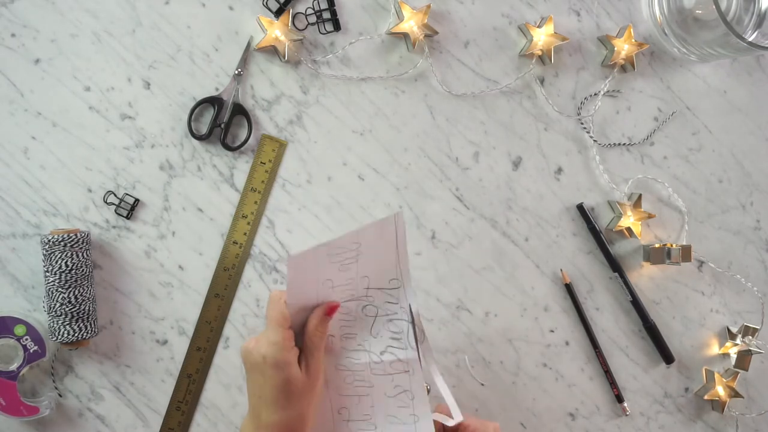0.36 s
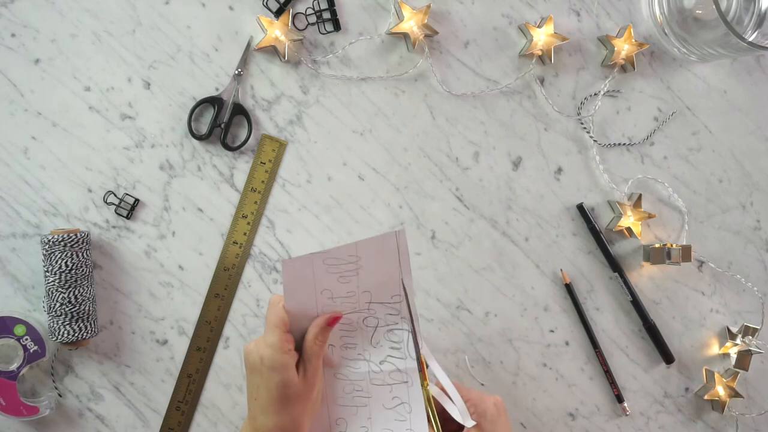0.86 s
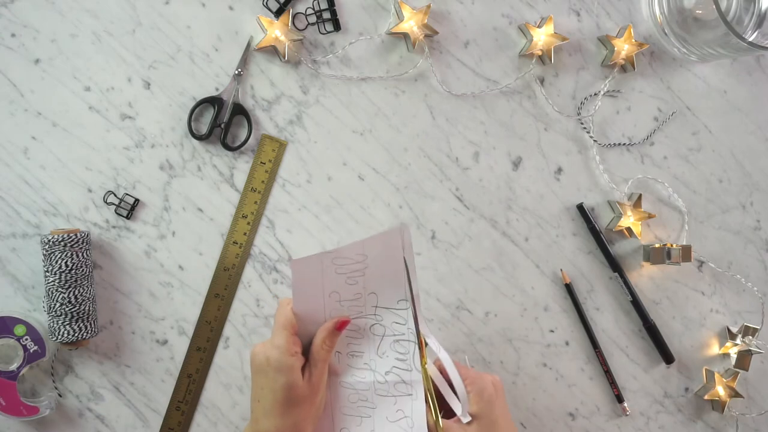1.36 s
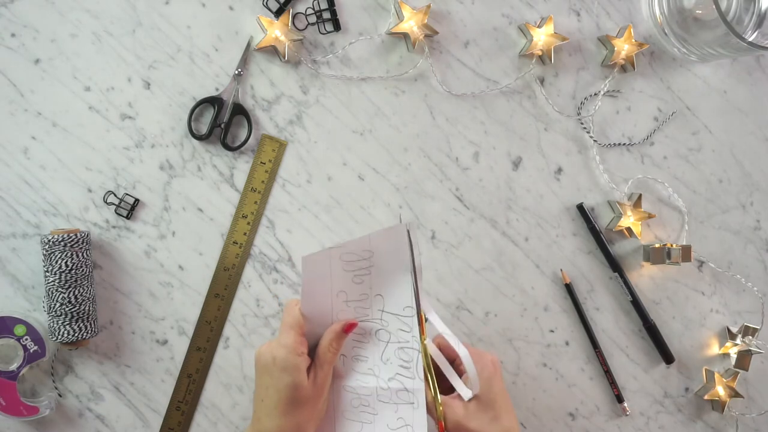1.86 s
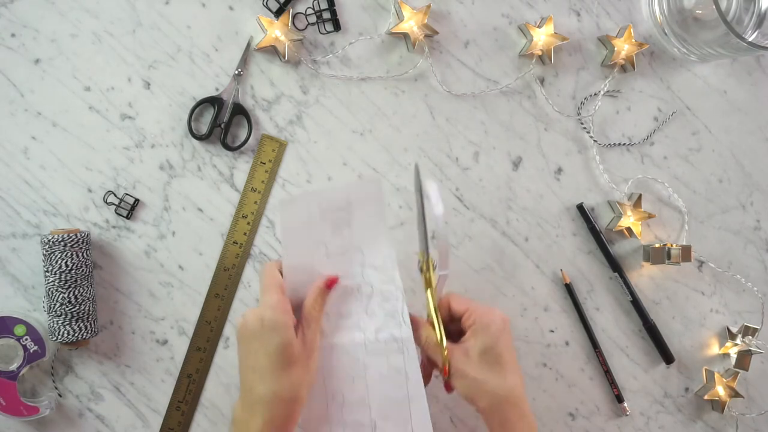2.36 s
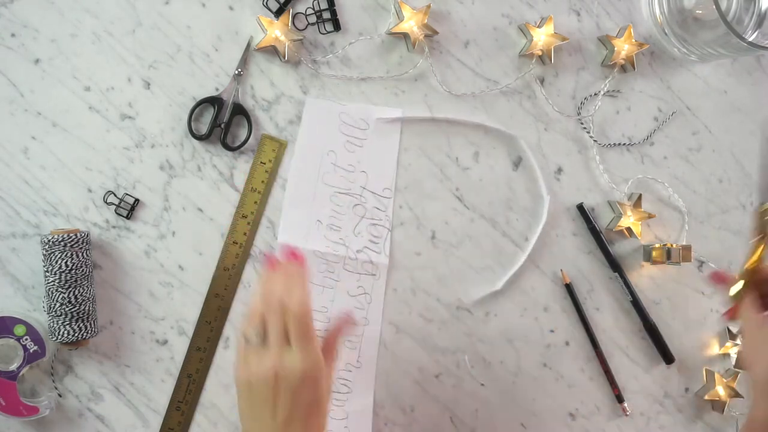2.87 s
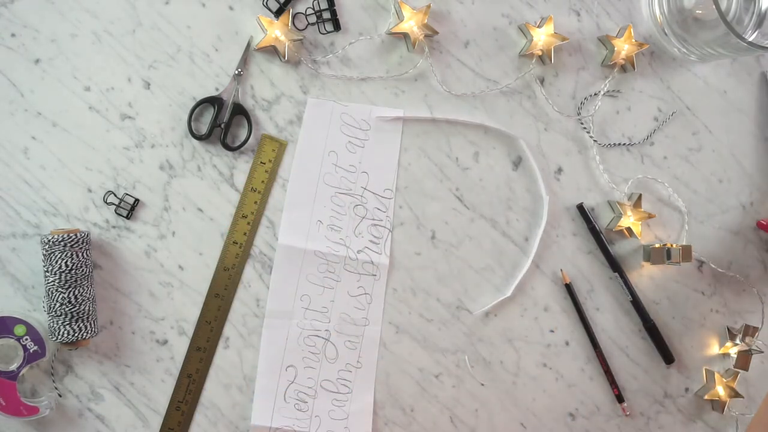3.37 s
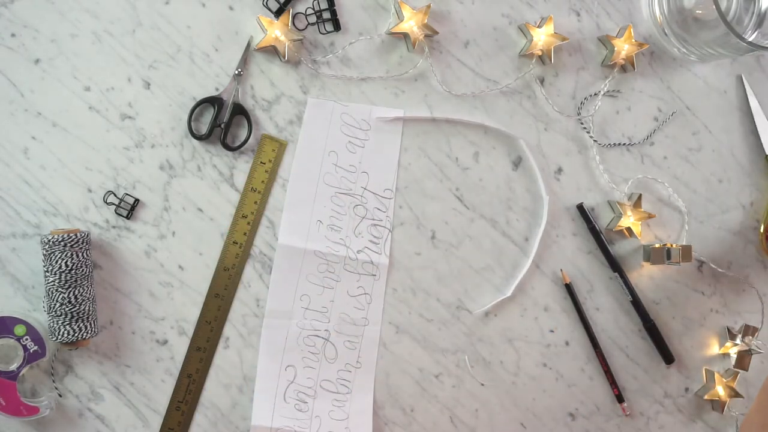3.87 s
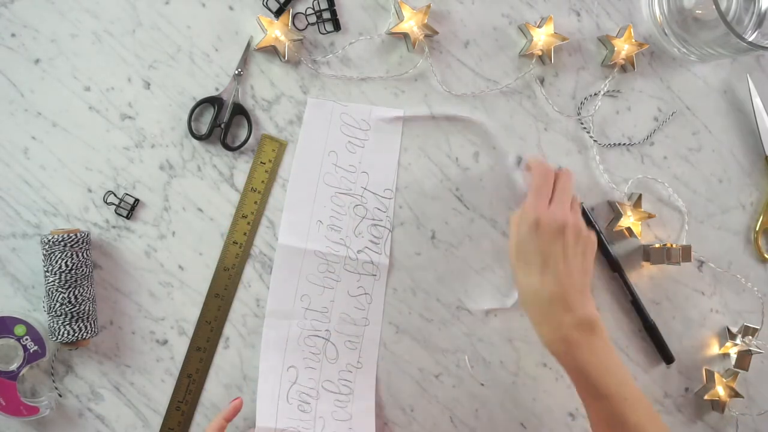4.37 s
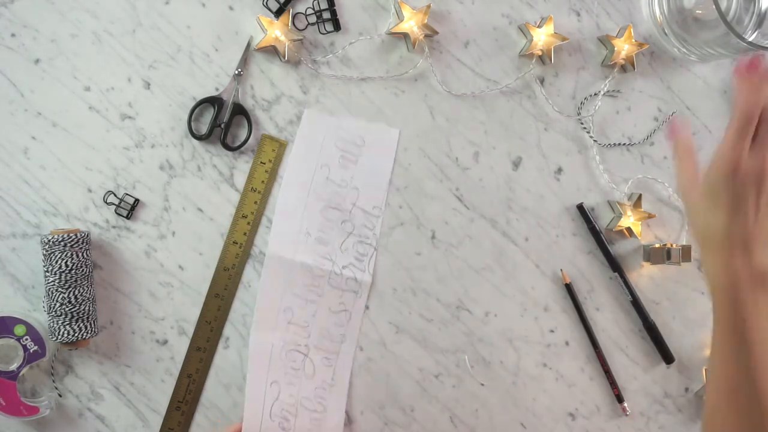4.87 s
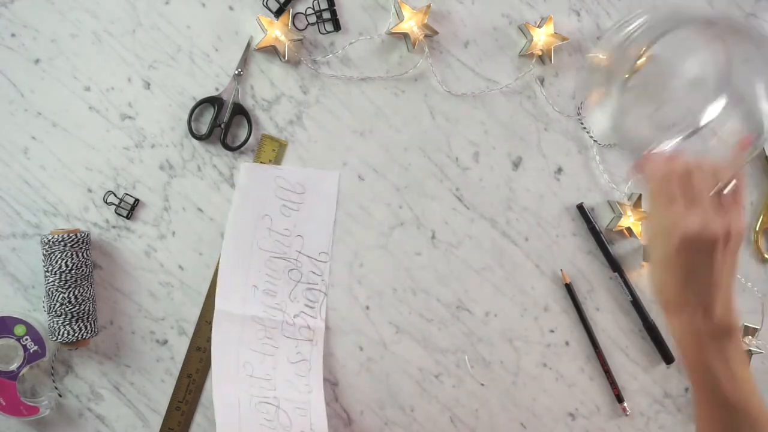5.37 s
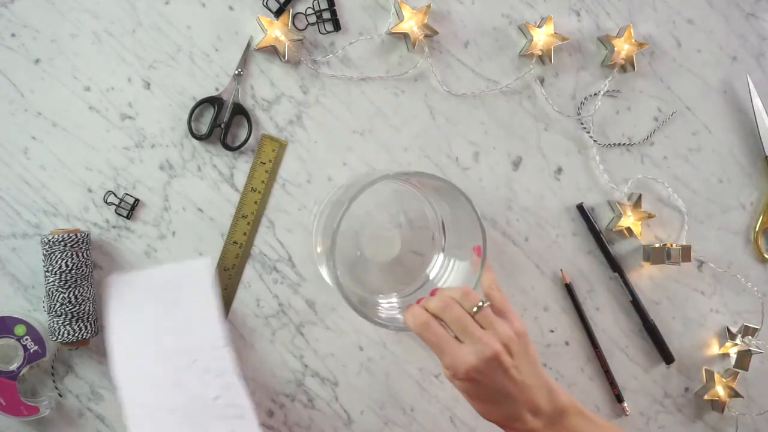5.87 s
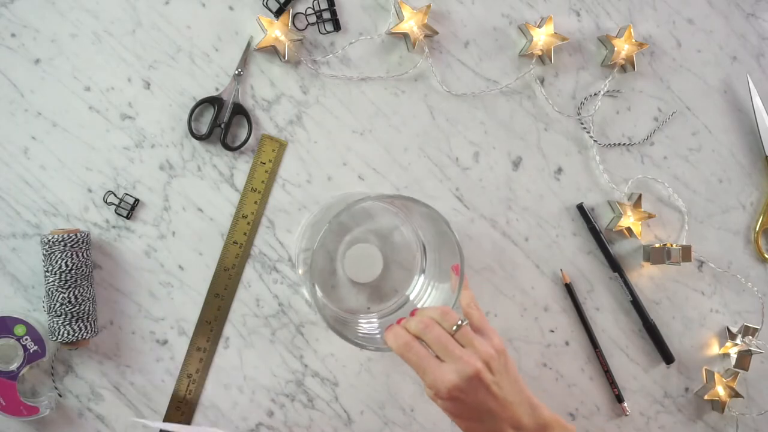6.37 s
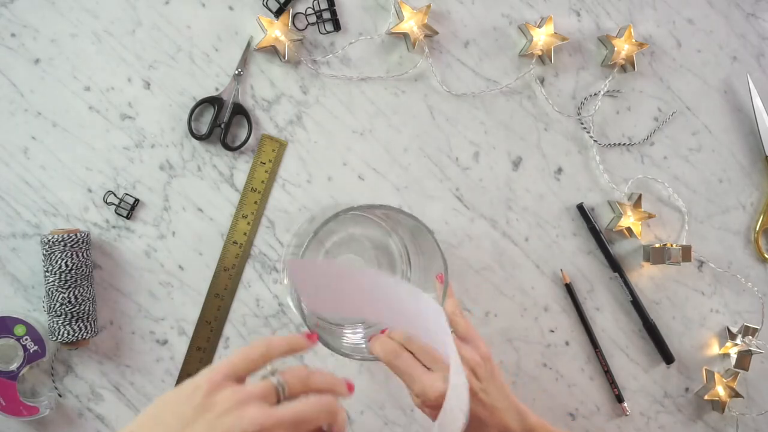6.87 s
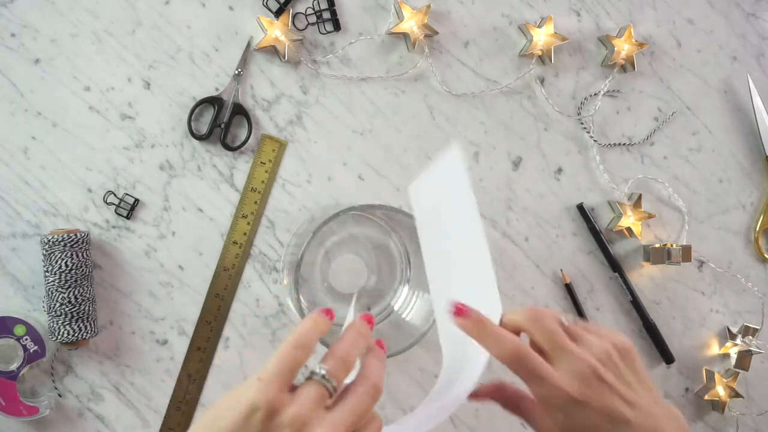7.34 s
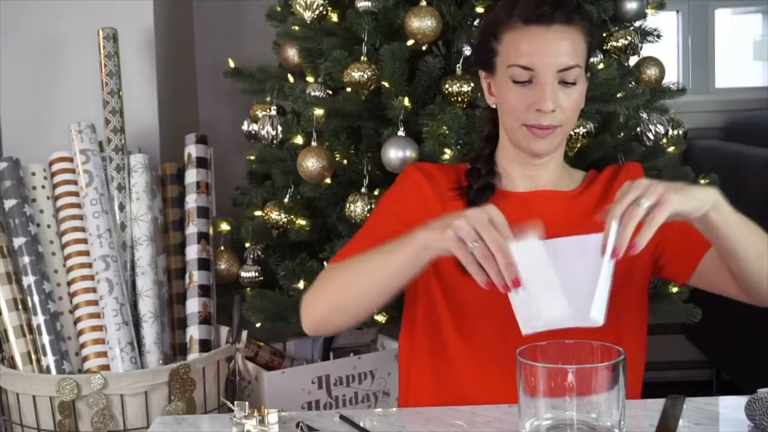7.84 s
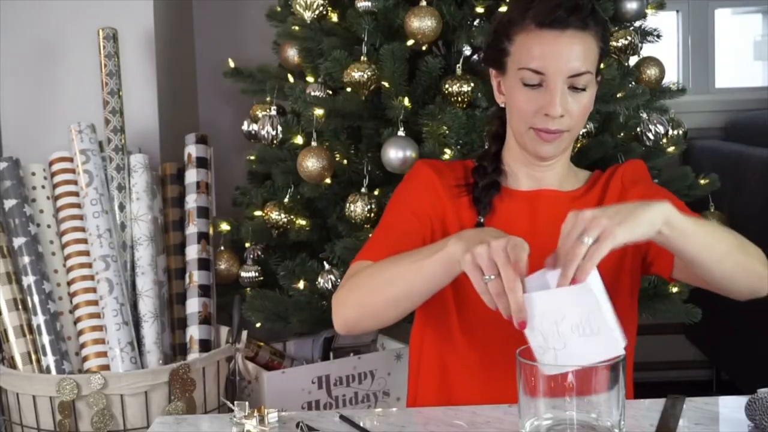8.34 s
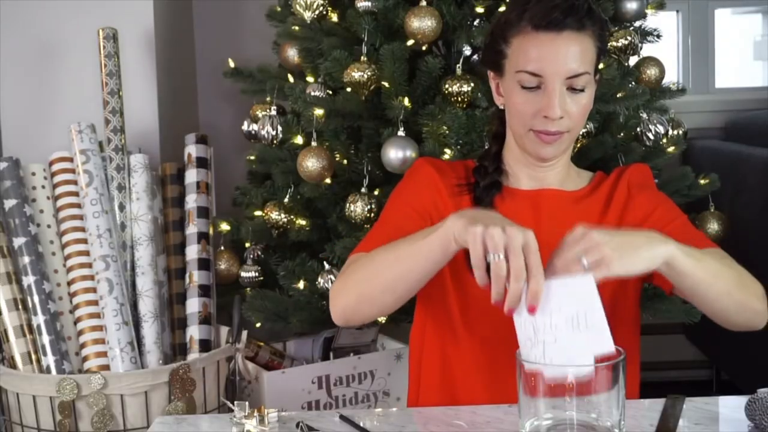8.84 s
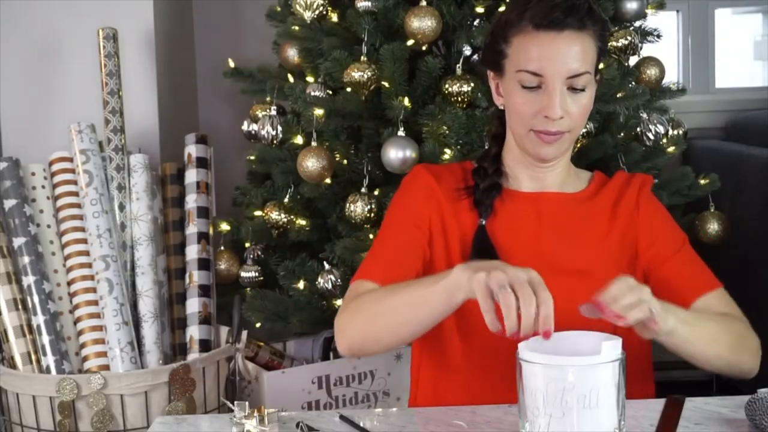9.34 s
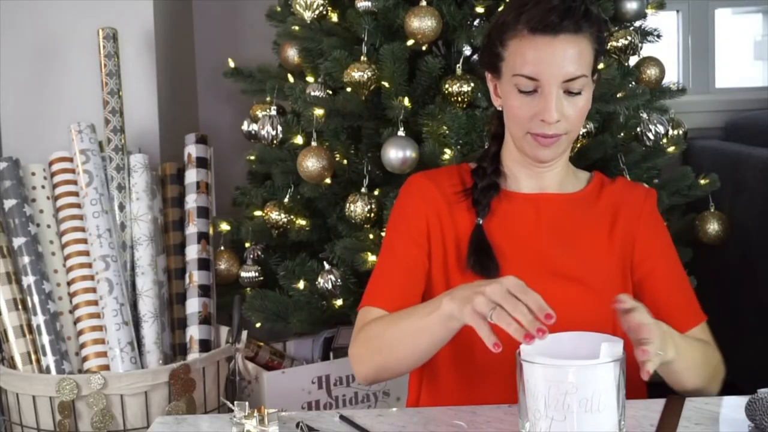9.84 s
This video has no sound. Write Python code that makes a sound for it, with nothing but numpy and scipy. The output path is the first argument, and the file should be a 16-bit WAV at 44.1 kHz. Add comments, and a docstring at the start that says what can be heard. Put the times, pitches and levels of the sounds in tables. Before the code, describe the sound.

Close in a quiet, hard room, scissors shear a sheet of paper in about nine crisp strokes with small snaps. The blades click shut, then the scissors scrape and clatter on a stone table. Paper slides lightly; a heavy glass vase lands with a sharp, loud knock and short ring. Finally the sheet is snapped taut, rolled and crackled into the vase with a hollow colour. One microphone, low house rumble.

```python
"""Scissors cut a strip off a sheet of paper, stroke by stroke, and clatter down on a stone table; a glass vase
is lifted and set down, and the sheet is rolled and pushed into it. A quiet, hard room; one microphone.
Cutting and paper are crackling noise shaped by gestures; blows are noise bursts through resonances and struck
modes. Inside the vase the air column colours the rustle; the room adds a diffuse tail, the house a low rumble."""
import sys
import numpy as np
from scipy import signal
from scipy.fft import rfft, irfft, next_fast_len
from scipy.io import wavfile
from scipy.ndimage import uniform_filter1d, map_coordinates

SR = 44100
rng = np.random.default_rng(int(sys.argv[2]) if len(sys.argv) > 2 else 0)


def to_wav(s):
    """Save 16-bit WAV."""
    ch = np.atleast_2d(s).T  # columns
    pcm = np.round(np.clip(ch, -1, 1) * 32767)  # PCM
    wavfile.write(sys.argv[1], SR, pcm.astype(np.int16))


def convert_level_to_amplitude(level_db):
    """Map a level in decibels to its linear amplitude factor."""
    exponent = np.asarray(level_db, float) / 20
    return 10 ** exponent


N = 439677  # samples


def unit(x):
    """Scaled to rms 1."""
    return x / np.sqrt(np.mean(x ** 2) + 1e-20)


def peak(x):
    """Scaled to peak 1."""
    return x / np.abs(x).max()


def along(points, hz):
    """(Hz, value) points read on a log frequency axis."""
    f, v = np.transpose(points)
    return np.interp(np.log(hz + 1), np.log(f + 1), v)


def levels(rows):
    """Per-sample dB for each column after the time, at -150 dB outside the stretch."""
    s, *columns = np.transpose(rows)
    return np.array([np.interp(np.arange(N) / SR, s, c, -150, -150) for c in columns])


def wobble(rate):
    """A smooth random curve, rate knots a second."""
    knots = rng.standard_normal(int(N * rate / SR) + 4)
    return map_coordinates(knots, [np.arange(N) * rate / SR])


def filtered(x, response):
    """x times a complex response of frequency."""
    m = next_fast_len(len(x) + 8192)
    return irfft(rfft(x, m) * response(np.fft.rfftfreq(m, 1 / SR)), m)[:len(x)]


def resonances(modes):
    """Causal response of resonances (Hz, width in Hz, dB), neighbours in opposite polarity."""
    def response(f):
        return sum((-1) ** k * convert_level_to_amplitude(db) * 1j * f * width / (hz * hz - f * f + 1j * f * width)
                   for k, (hz, width, db) in enumerate(modes))
    return response


def band(x, lo_hz, hi_hz):
    """Causal band-pass."""
    return signal.sosfilt(signal.butter(2, [lo_hz, hi_hz], "band", fs=SR, output="sos"), x)


def crackle(spectrum, grain_db, grain_hz, clump_db):
    """Noise of rms 1 made of slips: its level jumps quickly and in clumps, its colour shifts in patches."""
    slips = rng.standard_normal(N) * convert_level_to_amplitude(grain_db * wobble(grain_hz) + clump_db * wobble(35))
    z = signal.stft(slips, nperseg=256)[2]
    patches = uniform_filter1d(rng.standard_normal(z.shape), size=4, axis=0)  # across frequency
    patches = uniform_filter1d(patches, size=24, axis=1)  # across time
    slips = signal.istft(z * convert_level_to_amplitude(3.5 * unit(patches)), nperseg=256)[1][:N]
    return unit(filtered(slips, lambda f: convert_level_to_amplitude(along(spectrum, f))))


def burst(t60, length):
    """A sudden noise that dies away by 60 dB in t60 seconds."""
    return rng.standard_normal(length) * convert_level_to_amplitude(-60 * np.arange(length) / SR / t60)


def ring(modes, length):
    """Decaying modes (Hz, dB, t60 in s) struck with new strengths each time, to peak 1."""
    t = np.arange(length) / SR
    return peak(sum(convert_level_to_amplitude(db + rng.normal(0, 3) - 60 * t / t60) * np.sin(2 * np.pi * hz * t)
                    for hz, db, t60 in modes))


def add(track, s, sound):
    """Mixes a sound in at time s."""
    part = track[round(s * SR):][:len(sound)]
    part += sound[:len(part)]


def gestures(rows, rise_db, fade_db_per_s):
    """Gains of two layers: each gesture rises, holds while it sags, then fades."""
    t, gains = np.arange(N) / SR, np.zeros((2, N))
    for s, rise, hold, db, sag_db, second_db in rows:
        end = s + rise + hold
        shape_db = np.interp(t, [s, s + rise, end], [-rise_db, 0, -sag_db], -150)
        fade_db = np.outer(fade_db_per_s, np.clip(t - end, 0, None))
        gains += convert_level_to_amplitude(db + shape_db + np.array([[0], [second_db]]) - fade_db)
    return gains


def scattered(per_s, spread_db):
    """Impulses at random moments with random sizes."""
    return (rng.random(N) < per_s / SR) * convert_level_to_amplitude(spread_db * rng.standard_normal(N))


def sounded(impulses, t60, lo_hz, hi_hz):
    """Every impulse becomes the same short noise burst in a band, its peak set by the impulse."""
    return signal.fftconvolve(impulses, peak(band(burst(t60, SR // 20), lo_hz, hi_hz)))[:N]


def air():
    """Low rumble of the house, swelling a little, and faint hiss: noise through a fixed spectrum."""
    # Each row: frequency in Hz, relative level in dB
    air_spectrum = [(12, -49.5), (20, -6), (53, -3.5), (116, -15), (163, -14.5), (270, -28.5), (367, -26.5),
                    (527, -34.5), (1060, -32), (1570, -36), (16000, -55)]
    noise = unit(filtered(rng.standard_normal(N), lambda f: convert_level_to_amplitude(along(air_spectrum, f))))
    return convert_level_to_amplitude(-52 + 0.75 * wobble(1.4)) * noise


def room(x):
    """A diffuse tail, drawn anew every third of a second; each frequency dies at its own speed."""
    # Reverberation of the hard room. Each row: frequency in Hz, t60 in seconds
    walls = [(150, 0.35), (1000, 0.46), (4000, 0.37), (12000, 0.3)]
    wet, step = np.zeros(N), SR // 3
    for start in range(0, N, step):
        hz, t, z = signal.stft(rng.standard_normal(SR // 2), SR, nperseg=256)
        decay = convert_level_to_amplitude(-60 * t / along(walls, hz)[:, None])
        tail = signal.istft(z * decay, SR, nperseg=256)[1]
        tail = tail / np.linalg.norm(tail)
        add(wet, start / SR + .004, signal.fftconvolve(x[start:start + step], tail))  # 4 ms late
    return wet


def knock(db, dull_db, edge_db, thump_db, t60, steel_share):
    """A contact shakes the slab for a moment and thumps its legs, with a bright edge of noise and steel."""
    # Resonances of the stone slab. Each row: frequency in Hz, width in Hz, mean level in dB
    slab_modes = [(280, 60, -14), (530, 90, -7), (650, 90, -4), (780, 80, -2), (925, 120, 4),
                  (1060, 110, 8), (1285, 140, 8), (1390, 110, 5), (1850, 170, 4), (2060, 160, 1),
                  (2500, 250, -7)]
    # Resonances of the table legs. Each row: frequency in Hz, width in Hz, level in dB
    legs = [(31.3, 11, -2), (48, 56, -2.1), (97, 3.5, 4), (165, 71, -8)]
    # Modes of the scissors' steel. Each row: frequency in Hz, mean level in dB, t60 in seconds
    steel = [(4930, -13, 0.059), (6350, -12.5, 0.044), (7940, 6.5, 0.064), (7520, 1.5, 0.12)]
    length = SR // 2
    blow = burst(t60, length) + 2.6 * burst(0.0031, length)  # a sharp first touch, then chatter
    # each spot wakes other modes
    struck = [(hz, width, mode_db + rng.normal(0, 1.5)) for hz, width, mode_db in slab_modes]
    slab = filtered(blow, resonances(struck)) + .5 * band(blow, 630, 4700)
    middle = peak(band(band(slab, 900, 2600), 340, 5200))
    dull = peak(band(band(slab, 210, 640), 210, 640))
    thump = peak(filtered(blow, resonances(legs)))
    top_hz = np.clip(14000 * convert_level_to_amplitude(0.31 * edge_db), 4000, 17000)  # a faint edge is also a dull one
    edge = peak(band(burst(0.98 * t60, length), 2600, top_hz))
    edge = edge + steel_share * ring(steel, length)
    return convert_level_to_amplitude(db) * (convert_level_to_amplitude(-1) * middle + convert_level_to_amplitude(edge_db + 9.5) * edge
                      + convert_level_to_amplitude(dull_db + 5) * dull + convert_level_to_amplitude(thump_db + 3) * thump)


def table():
    """Steel clatter, blunt thuds and the scissors dragged over the stone, heard through its resonances."""
    # Scissors clattering down. Each row: time in seconds, level in dB, steel clink in relative dB, t60 in seconds
    clatter = [(3.436, -33, -9.5, 0.15), (3.964, -27.5, -21.5, 0.2), (4.085, -10.5, -8.5, 0.13),
               (4.13, -11.5, -11, 0.12), (4.156, -10.5, -12.5, 0.07), (4.168, -14, -17.5, 0.11),
               (4.205, -18, -12.5, 0.23), (4.228, -22, -26, 0.061)]
    # Ring of the scissors' handles. Each row: frequency in Hz, mean level in dB, t60 in seconds
    handles = [(953, 0, .16), (1497, -12, .12), (1863, -11, .11), (2250, -18, .1), (2570, -12, .07),
               (3480, -17, .09)]
    # Blunt contacts of handle, hand or vase base. Each row: time in seconds, level in dB,
    # dull slab and thump in relative dB, t60 in seconds
    thuds = [(3.531, -35.5, 1, -12, 0.051), (4.404, -42.5, 7, 9.5, 0.07), (5.199, -33, -0.5, -13, 0.105),
             (5.998, -22, -22.5, -46, 0.027), (6.775, -36, -6, -47.5, 0.11), (6.791, 4.5, -22, -29, 0.07),
             (6.848, -13.5, -11, -19, 0.099), (6.875, -8, -16, -17, 0.048),
             (6.928, -14.5, -8, -23.5, 0.061), (7.6965, -18, -6.5, -15, 0.025)]
    # Scissors dragged over the stone. Each row: time in seconds, level in dB
    drag = [(3.557, -39.5), (3.597, -49.5), (3.627, -61), (3.737, -41.5), (3.786, -67.5), (3.856, -74),
            (3.946, -55)]
    # Resonances of the dragging. Each row: frequency in Hz, width in Hz, level in dB
    scrape = [(295, 34, -5), (990, 110, -1), (1367, 29, 2), (4280, 380, -17)]
    track = np.zeros(N)
    for s, db, clink_db, t60 in clatter:
        add(track, s, knock(db, -12, clink_db, -23.5, t60, steel_share=0.48))
        handles_db = -14 - 0.5 * db  # against the blow: light taps ring freer
        add(track, s, convert_level_to_amplitude(db + handles_db) * ring(handles, SR // 2))
    for s, db, dull_db, thump_db, t60 in thuds:
        edge_db = -29.5 + 1.1 * db  # harder contacts are brighter
        add(track, s, knock(db, dull_db, edge_db, thump_db, t60, steel_share=0))
    rub = crackle([(100, 0), (16000, 0.0036)], grain_db=5, grain_hz=138, clump_db=4.5)
    for _ in range(2):  # twice through, for sharper resonances
        rub = filtered(rub, resonances(scrape))
    return track + convert_level_to_amplitude(levels(drag)[0]) * unit(rub)


def vase():
    """The glass rings briefly on contact and grates on the stone as it is pushed."""
    # The vase leaves or meets the stone. Each row: time in seconds, peak in dB
    vase_rings = [(5.204, -29), (5.998, -47.5), (6.792, -13)]
    # Modes of the glass. Each row: frequency in Hz, mean level in dB, t60 in seconds
    glass = [(547, -4, 0.25), (693, -8.5, 0.25), (926, -16, 0.2), (1393, 2, 0.12), (1960, -12, 0.08)]
    # The base slides over the stone. Each row: time in seconds, level in dB
    vase_slide = [(6.0, -59), (6.08, -60.5), (6.2, -57), (6.345, -54.5), (6.365, -78)]
    track = np.zeros(N)
    for s, db in vase_rings:
        add(track, s, convert_level_to_amplitude(db) * ring(glass, SR // 2))
    grains = rng.standard_normal(N) * convert_level_to_amplitude(3.1 * wobble(180) + 1.6 * wobble(23))
    grating = unit(band(band(grains, 1350, 2100), 1100, 2800))
    return track + convert_level_to_amplitude(levels(vase_slide)[0]) * grating


def clicks_and_tinks():
    """Dry clicks as short bursts of treble, and thin clear tones of glass or steel touched lightly."""
    # Scissor blades meeting, one touch of the scissors on the stone, and two as the vase settles. Each row:
    # time in seconds, level in dB
    clicks = [(2.73, -15.5), (2.7337, -14), (2.743, -28.5), (2.7618, -31), (2.778, -23.5), (2.789, -21.5),
              (3.9587, -35.5), (6.94, -33), (6.972, -35)]
    # Small clear rings. Each row: time in seconds, level in dB, frequency in Hz, t60 in seconds before damping
    tinks = [(5.0973, -54, 2875, .5), (7.147, -57, 4890, .4), (7.4066, -51, 2875, .6)]
    track = np.zeros(N)
    for s, db in clicks:
        add(track, s, convert_level_to_amplitude(db - 2) * peak(band(burst(.014, SR // 3), 3500, 17000)))
    damping = np.hanning(SR // 4)[SR // 8:][:SR // 8]  # down to silence within 1/8 s
    for s, db, hz, t60 in tinks:
        add(track, s, convert_level_to_amplitude(db) * ring([(hz, 0, t60)], SR // 8) * damping)
    return track


def paper():
    """Sliding hiss, the sheet's body and its snaps; inside the vase the air column rings with them."""
    # Paper sliding or turned. Each row: start in seconds, rise in seconds, hold in seconds, hiss in dB,
    # sag over the hold in dB, body in dB against the hiss
    slides = [(2.33, .08, 0.054, -58.5, 2, -2.5), (2.485, 0.017, 0.3, -56.5, 20.5, 8),
              (4.43, 0.055, 0.055, -42.5, 23.5, -18), (4.598, 0.014, .18, -57.5, 15, -1.5),
              (4.81, 0.0069, 0.084, -68.5, 19.5, 14), (5.06, 0.0088, 0.1, -56.5, 10, 0),
              (5.44, 0.073, .04, -65.5, 13.5, 3.5), (5.65, 0.13, 0.0295, -69, -3, -2),
              (5.9, 0.0091, 0.12, -65.5, 12, 9), (6.08, 0.058, 0.21, -66.5, -5, 5),
              (6.45, 0.18, 0.22, -60, 13, 2.5), (7.06, 0.03, 0.03, -56.5, 4, 10),
              (7.2, 0.049, .05, -53.5, 2, 1.5), (7.4, 0.0079, 0.078, -63, 10, 7.5),
              (7.485, 0.0097, 0.086, -50, 11, 8.5), (7.6, 0.04, 0.038, -50, 1.5, 4),
              (9.68, 0.0147, 0.13, -45, 16, -1.5), (9.87, .05, 0.041, -54, 10, -9)]
    # The sheet is rolled up and pushed into the vase. Each row: time in seconds, hiss in dB, body in dB
    rolling = [(7.75, -48, -71), (7.904, -57.5, -59), (8.0, -51.5, -52.5), (8.014, -52.5, -39.5),
               (8.05, -56, -38), (8.148, -50.5, -41.5), (8.188, -51, -50), (8.27, -48, -51),
               (8.29, -47, -39.5), (8.41, -64, -39), (8.486, -66, -61), (8.496, -59.5, -46),
               (8.58, -49, -36), (8.712, -58, -47), (8.865, -50, -40), (8.895, -67, -44),
               (8.93, -49.5, -41), (9.026, -61.5, -41.5), (9.156, -55.5, -50), (9.218, -56.5, -48),
               (9.228, -62, -38), (9.248, -57.5, -45.5), (9.276, -52.5, -37), (9.364, -55.5, -59.5),
               (9.372, -72.5, -50), (9.48, -95.5, -80)]
    # Snaps and ticks. Each row: time in seconds, level in dB, body and edge in relative dB
    snaps = [(0.0101, -24, -16.5, -41.5), (0.35, -32.5, -3, -30), (0.6944, -27.5, -9, -60.5),
             (0.755, -27.5, -22, -23.5), (1.236, -30.5, -6.5, -13.5), (1.44, -31.5, -21, -12.5),
             (1.8894, -36, 1, -12), (2.0704, -27, -32, -11), (2.155, -24.5, -30, -20),
             (2.252, -29, -22, -25), (2.267, -24, -15.5, -15), (2.2896, -28.5, -0.5, -35.5),
             (2.396, -48, -18, -5), (2.4413, -38, -23, -21.5), (2.4923, -32, -18, -30),
             (2.6032, -41.5, 6.5, -26), (2.6528, -27, -11, -13), (2.8307, -28.5, -18, -20),
             (4.481, -36, -36, -14.5), (4.6046, -40.5, -27, 1.5), (4.7007, -44.5, -26, -0.5),
             (5.07, -52.5, -9, 5.5), (5.9685, -35, -14, -30), (7.1447, -26.5, -15, -23),
             (7.233, -44, -27.5, -9), (7.4375, -38, -31, -13), (7.4937, -41.5, -12, -3),
             (7.6964, -12, -7.5, -38.5), (7.711, -24.5, 1, -21.5), (7.7324, -18.5, -12.5, -24),
             (7.973, -46, 0, -10), (8.0144, -34, 4.5, -16.5), (8.08, -45, -16, -23),
             (8.091, -23.5, -3.5, -36.5), (8.1195, -41.5, 6.5, -10.5), (8.193, -36.5, -23, -13.5),
             (8.27, -34.5, -17, -14.5), (8.305, -26.5, -9, -14), (8.388, -41, 7, -18.5),
             (8.493, -36.5, 9, -12.5), (8.5376, -24.5, -2, -23.5), (8.6521, -34, 0.5, -7),
             (8.712, -35.5, 1, 9), (8.728, -28, -14, -7.5), (8.7711, -28.5, -6, -20), (8.839, -35, 4, -7),
             (8.9082, -40.5, 7.5, -4.5), (9.0041, -33, 2, -14), (9.042, -34, -9, -11),
             (9.0742, -35.5, -2.5, -18.5), (9.2275, -33.5, 4.5, -32), (9.268, -24.5, 1.5, -32),
             (9.29, -21, -9, -34), (9.3725, -30.5, -13, -32), (9.6872, -29.5, -3, -30)]
    # Spectrum of the hiss. Each row: frequency in Hz, relative level in dB
    hiss_spectrum = [(1180, -27.5), (2000, -10), (3840, -7), (5250, -1.5), (6880, -18.5), (8700, -4),
                     (10600, -24.5), (13500, -11), (16000, -21.5)]
    # Spectrum of the sheet's body. Each row: frequency in Hz, relative level in dB
    sheet_spectrum = [(150, -40.5), (260, -1.5), (660, -9), (1100, 3), (1750, -6.5), (2400, -14),
                      (3600, -34.5), (6000, -51)]
    # Resonances of the air in the vase. Each row: frequency in Hz, width in Hz, level in dB
    vase_air = [(618, 68, 12.8), (1277, 54, 10.9), (1880, 210, 2.87)]
    # The roll enters the vase: start and end in seconds
    into_vase = (7.95, 8.45)
    rolling_db = levels(rolling)
    sliding, flexing = gestures(slides, rise_db=12.5, fade_db_per_s=[400.5] * 2) + convert_level_to_amplitude(rolling_db)

    # small creases tick in the hiss and pop in the body
    creases_per_s, spread_db = 75, 4
    creases = convert_level_to_amplitude(6) * sounded(scattered(creases_per_s, spread_db), 0.0046, 1200, 17000)
    pops = convert_level_to_amplitude(7.5) * sum(sounded(scattered(creases_per_s / 3, spread_db), 0.026, hz, 1.61 * hz)
                          for hz in (480, 950, 1500))
    hiss = sliding * (creases + crackle(hiss_spectrum, grain_db=3.5, grain_hz=600, clump_db=3))
    body = flexing * unit(pops + crackle(sheet_spectrum, grain_db=2.5, grain_hz=300, clump_db=2.5))

    # the rolled sheet rubbing on itself is brighter
    sheen = unit(band(rng.standard_normal(N), 9600, 16000))
    hiss += convert_level_to_amplitude(rolling_db[0] - 8 + 3 * wobble(30)) * sheen
    for s, db, body_rel_db, edge_db in snaps:
        add(hiss, s, convert_level_to_amplitude(db - 2) * peak(band(burst(.015, SR // 8), 1500, 5500)))
        add(hiss, s, convert_level_to_amplitude(db + edge_db + 11) * peak(band(burst(0.0074, SR // 8), 10000, 22000)))
        add(body, s, convert_level_to_amplitude(db + body_rel_db + 5) * peak(band(burst(0.065, SR // 8), 350, 1630)))

    inside = np.interp(np.arange(N) / SR, into_vase, [0, 1])
    column = filtered(inside * (body + 7.5 * hiss), resonances(vase_air))
    return hiss + (1 - 0.6 * inside) * body + 0.44 * column


def cutting():
    """Fibres part between the blades, which ring more or less as the cut goes on; the held sheet sounds lower."""
    # Scissor strokes. Each row: start in seconds, rise in seconds, hold in seconds, shearing in dB,
    # sag over the hold in dB, sheet body in dB against the shearing
    strokes = [(0.0, 0.033, 0.1, -43, 20, 3.5), (.128, 0.0046, 0.18, -45.5, 14.5, -5.5),
               (.29, 0.044, 0.16, -40.5, 17.5, 6), (.49, 0.065, 0.3, -35, 17, 1),
               (.905, 0.0091, 0.23, -47.5, 1.5, 2), (1.205, 0.043, 0.18, -39.5, 2, -4.5),
               (1.537, 0.0063, 0.097, -41, -0.5, -1.5), (1.79, 0.01, 0.16, -41, -2.5, -5),
               (2.062, 0.0079, 0.19, -40.5, 5, -3.5)]
    # Spectrum of the shearing. Each row: frequency in Hz, relative level in dB
    shear_spectrum = [(240, -15), (400, -9), (655, -15), (1010, -1.5), (1600, 2), (4240, 4.5), (5900, -5),
                      (6900, -16.5), (16000, -18.5)]
    # Resonances of the blades. Each row: frequency in Hz, width in Hz, mean level in dB
    blades = [(990, 74, 3.5), (2150, 460, 7.5), (3300, 350, 6), (4420, 440, 6), (8220, 870, 22)]
    # the held sheet dies more slowly than the shearing
    shearing, booming = gestures(strokes, rise_db=15.5, fade_db_per_s=[422, 195])
    fibres = crackle(shear_spectrum, grain_db=3, grain_hz=500, clump_db=1.2)
    # reversed fibre noise drives the blades, so that their ring is independent of it
    blade_ring = sum(convert_level_to_amplitude(1.9 * wobble(14)) * filtered(fibres[::-1], resonances([mode])) for mode in blades)
    fibres = fibres + 0.44 * blade_ring
    # single fibres snapping in the cut, 100 a second
    grit = convert_level_to_amplitude(2.5) * band(sounded(scattered(100, spread_db=3.5), 0.002, 920, 7300), 900, 7000)
    shear = unit(band(fibres, 2500, 19000))
    flutter_db = 1 - 2.5 * np.arange(N) / SR  # the sheet flutters less as the cut nears its end
    flutter = convert_level_to_amplitude(flutter_db) * unit(band(fibres, 1320, 2450))
    sheet = unit(band(fibres, 375, 1310))
    return shearing * (shear + grit + flutter) + booming * sheet


def scene():
    """Everything at the table, its room and the still air."""
    near = cutting() + paper() + clicks_and_tinks()
    hits = table() + vase()
    wet = room(convert_level_to_amplitude(-8.5) * near + convert_level_to_amplitude(-8) * hits)
    return (near + hits + wet + air())[None]


def roll_off(x):
    """The treble ends steeply here."""
    return signal.sosfilt(signal.butter(12, 16530, fs=SR, output="sos"), x)


def record(dry):
    """The microphone's signal is clipped at full scale; little passes above the recorder's band limit."""
    def band_limit(hz):
        return convert_level_to_amplitude(-22 * (hz > 15900) - 60 * (hz > 16530))
    mix = filtered(np.clip(dry[0], -1, 1), band_limit)[None]
    return roll_off(mix)


dry = scene()
out = record(dry)
to_wav(out)
```